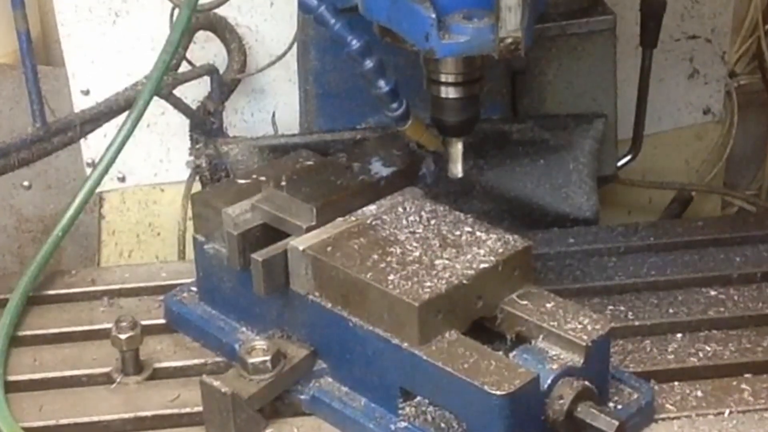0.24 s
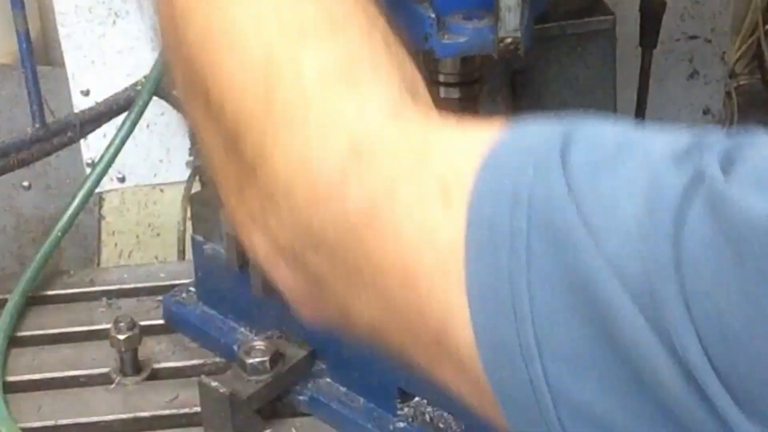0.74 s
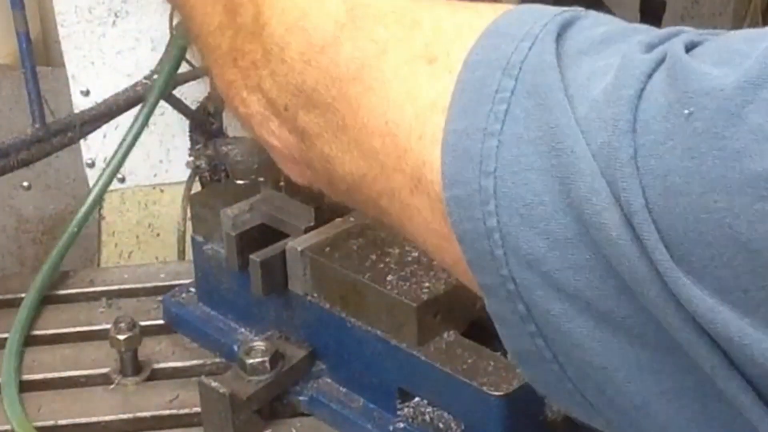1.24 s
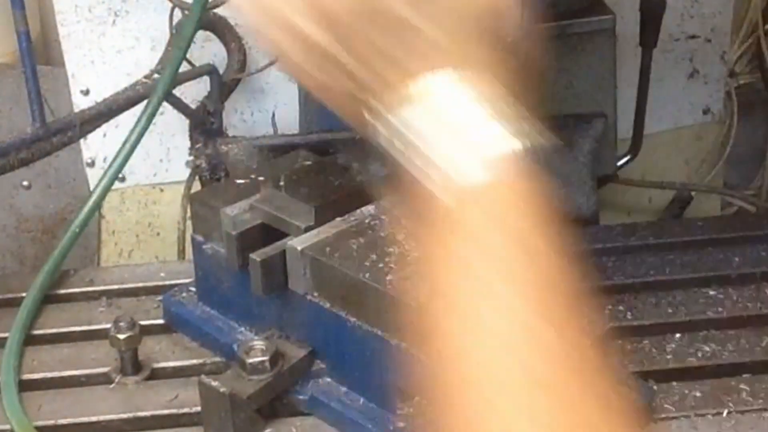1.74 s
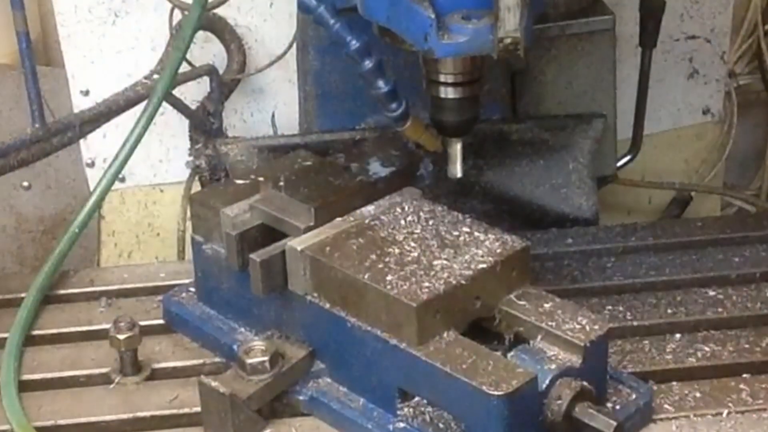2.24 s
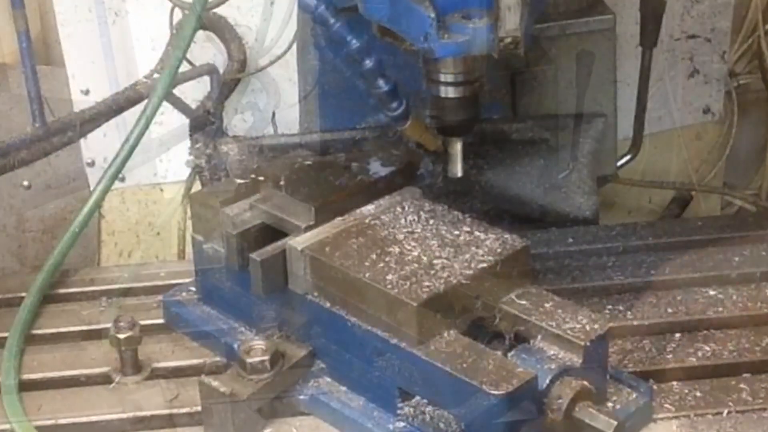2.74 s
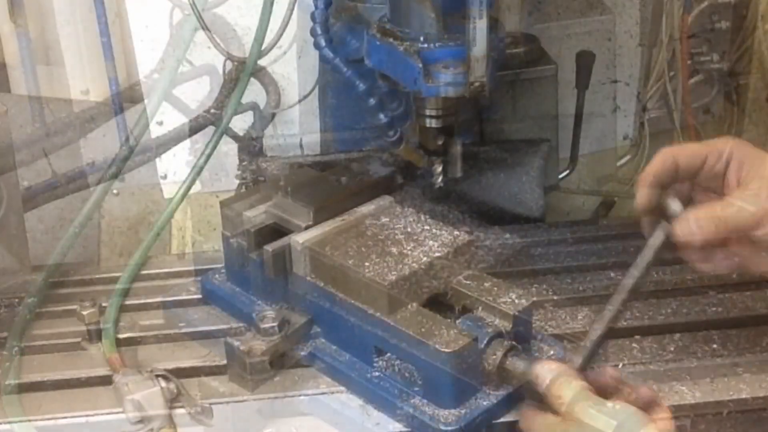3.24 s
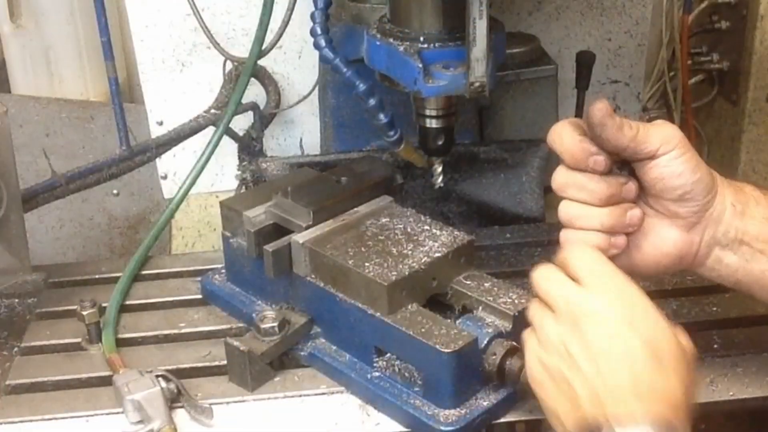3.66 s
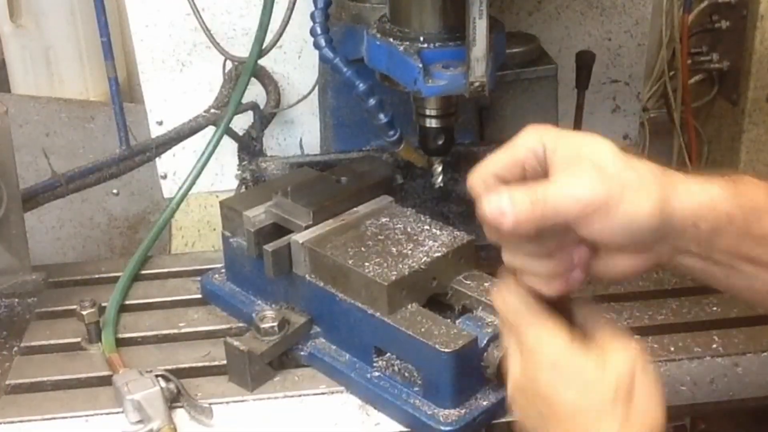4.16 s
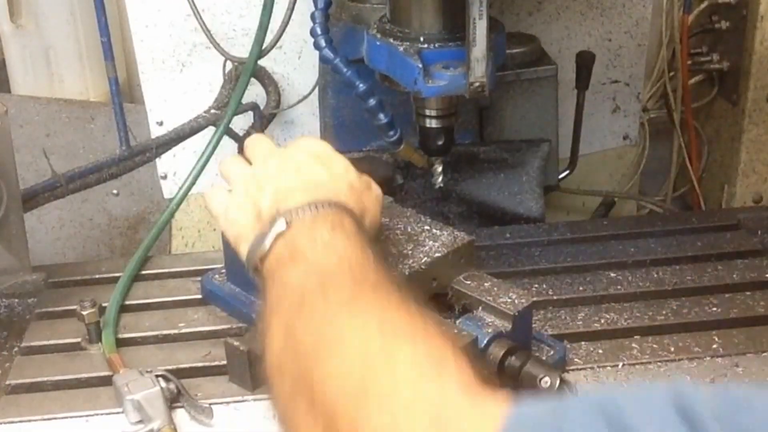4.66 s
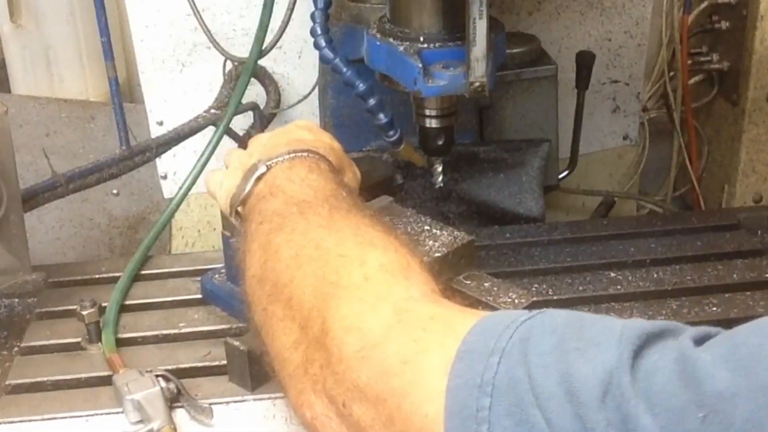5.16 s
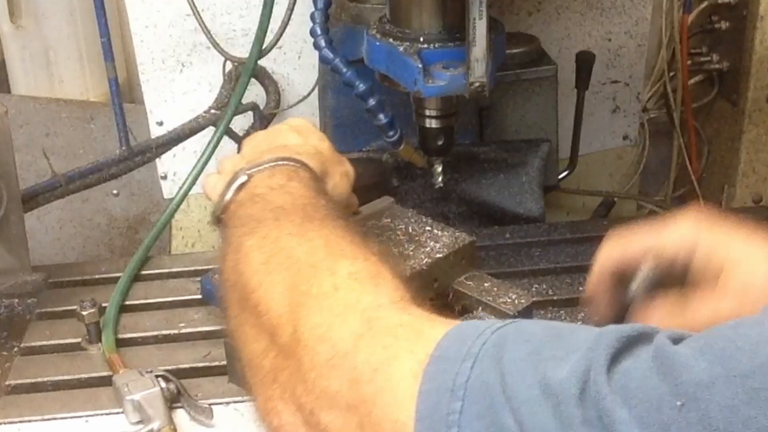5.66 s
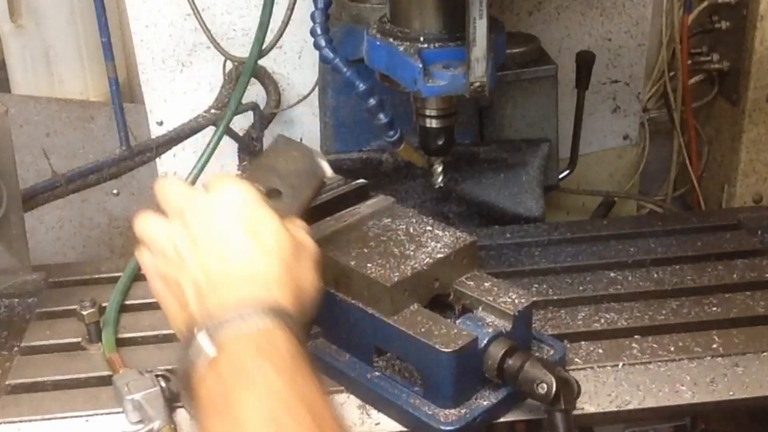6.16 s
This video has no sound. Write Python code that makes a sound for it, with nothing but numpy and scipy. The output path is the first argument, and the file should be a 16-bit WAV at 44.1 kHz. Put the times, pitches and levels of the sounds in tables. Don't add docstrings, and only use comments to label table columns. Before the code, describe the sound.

Geared motor drone and bright air jet with little ticks, abruptly replaced by a soft air leak, metal scrape and clank, squeaks and a final sharp crack.

```python
import sys
import numpy as np
from scipy import signal
from scipy.fft import rfft, irfft, next_fast_len
from scipy.io import wavfile
from scipy.ndimage import uniform_filter1d

SR = 44100
rng = np.random.default_rng(int(sys.argv[2]) if len(sys.argv) > 2 else 0)


def amplitude_ratio(level_db):
    exponent = np.asarray(level_db, float) / 20
    return 10 ** exponent


def bounce(signal):
    frames = np.transpose(np.atleast_2d(signal))
    limited = np.clip(frames, -1, 1)
    pcm = np.round(limited * 32767).astype(np.int16)
    wavfile.write(sys.argv[1], SR, pcm)


N = 281799
CUT_S, CUT_DIP_S = 3.1125, .0012

# pitch_hz, level_db (per Hz)
DRONE_SPECTRUM = [(65, -64), (110, -28), (195, -13.5), (242, -9.5), (302, -6.5), (371, 0), (397, -7.5),
                  (483, -7.5), (850, -12), (1100, -32), (1870, -120)]
# pitch_hz, width_hz, level_db
HOUSING_BOOMS = [(272, 61, -7), (312, 13, -12), (526, 32, -22), (598, 155, 3.5), (710, 4.5, 6)]
# pitch_hz, level_db (per Hz)
RATTLE_SPECTRUM = [(700, -19), (820, -0.5), (950, -5), (1050, 4), (1150, -10), (1260, 2.5), (1400, -3),
                   (1500, -5.5), (1800, -23.5)]
# start_s, rattle_db, motor_lift_db
GEAR_LOAD = [(0, 1, 4), (.25, 1.5, -2), (.55, 0, 3.5), (.67, 3, 0), (.82, -1, -3.5), (.9, 4, 3),
             (1.12, 0.5, -5), (1.35, 3, -1.5), (1.52, -0.5, -17), (1.62, 2, 1.5), (1.77, 0, -6),
             (1.95, 2, 1.5), (2.2, -1, 2), (2.35, 0.5, 2), (2.65, 2.5, 1.5), (2.75, 0.5, 4), (2.85, 0, 0),
             (2.92, 3.5, 0)]
# pitch_hz, level_db
GEAR_TONES = [(123.8, -83), (188.4, -77), (247.6, -61.5), (279.9, -65), (333.8, -67.5), (473.7, -68),
              (613.7, -65), (699.8, -74), (772, -64.5), (877.5, -76), (1040, -78.5), (1071, -69),
              (1249, -70)]
# pitch_hz, level_db
MOTOR_WHINE = [(3000, -80), (3849, -71.5), (3949, -80), (4048, -74.5), (5886, -75), (7897, -75),
               (7998, -69.5)]
# pitch_hz, level_db (per Hz)
BEARING_SPECTRUM = [(820, -19.5), (1400, -10), (1690, -8.5), (1910, -6), (2910, -7), (3410, -8),
                    (3920, -8.5), (4650, -9.5), (6030, -7), (7220, -9.5), (8230, -6), (9750, -9.5),
                    (10700, -19), (14000, -14.5), (15300, -35)]
# pitch_hz, width_hz, level_db
CAGE_RINGS = [(2220, 41, -6), (2500, 45, -4.5), (2630, 37, -6), (2730, 40, -6), (4430, 40, -4),
              (5100, 110, -6), (6580, 21, -5), (8298, 30, -5)]
SHAFT_HZ = 32.8
DRONE_DB, RATTLE_DB, BEARING_DB = -58.5, -59, -53

# pitch_hz, level_db (per Hz)
NOZZLE_SPECTRUM = [(2000, -17), (4000, -14.5), (7000, -9.5), (8200, -3.5), (9300, -5), (10200, -10.5),
                   (11500, -4), (12200, -4.5), (12800, 0.5), (13500, -3), (14300, -1), (15200, -4)]
JET_DB, SHADE_S, SHADE_RAMP_S, SHADE_DB = -44, 0.64, 0.23, -3
SHADE_DULL, SHADE_HZ = 0.46, 11000
VALVE_S, VALVE_DB, SHUT_DB_PER_S = 1.35, -48, 600

# start_s, level_db, pitch_hz, hold_s, fade_60db_s
LEVER_CLICKS = [(.7275, -48, 2950, .006, .03), (.742, -49, 2880, .005, .02), (.753, -52, 2920, .006, .03),
                (1.354, -45, 2810, 0.0037, 0.014), (1.352, -53, 5300, .004, .012),
                (1.363, -47, 3780, .003, .012), (1.575, -60, 2220, 0.012, .04),
                (1.808, -58, 2130, 0.013, 0.036), (2.108, -61, 2630, 0.024, .04),
                (2.655, -58, 2850, 0.027, .05)]
# start_s, peak_db, pitch_hz, fade_60db_s
HEAD_TICKS = [(.494, -40, 2670, .02), (.523, -40, 2220, .02), (.551, -47, 2250, .02),
              (.574, -49, 3020, .02), (.843, -44, 3000, .02), (.87, -42, 2270, 0.022),
              (.958, -44, 2180, .02), (1.806, -49, 2000, .02), (1.834, -58, 2400, .02),
              (1.923, -43, 2280, 0.022), (1.924, -61, 900, 0.027), (1.955, -43, 2150, .02),
              (2.668, -40, 2930, .02), (2.691, -43.5, 2850, 0.016), (2.776, -41, 1050, 0.047),
              (2.916, -47, 1950, .02)]

# start_s, socket_clunk_db, overtone_db, lean_to_upper_modes_db
HANDLE_CLANKS = [(3.26, -50, -61.5, -4), (3.288, -32, -57, 9), (3.2972, -30, -60, 12),
                 (3.3005, -35.5, -43.5, 9), (3.306, -34, -50, 1), (3.310, -36.5, -46, 6),
                 (3.315, -41, -48, -3), (3.321, -50, -62, 4), (3.328, -53, -56, 4), (3.332, -55, -53, -2),
                 (3.3436, -39, -40.5, -6), (3.349, -50, -60, 2), (3.4435, -40.5, -43, 6),
                 (3.4465, -43, -42, -3), (3.454, -48, -55, -5), (3.471, -54, -54, 3), (3.493, -53, -51, 7),
                 (3.509, -53, -54, 11)]
# start_s, level_db, pitch_hz, hold_s, fade_60db_s
METAL_RINGS = [(3.288, -38, 3700, .003, .025), (3.288, -39, 3165, .003, .025),
               (3.297, -33, 3720, .004, .04), (3.297, -37, 3100, 0.0069, .04),
               (3.2975, -36, 1367, 0.017, .04), (3.298, -42.5, 2403, .012, .04),
               (3.306, -37.5, 1773, .014, 0.056), (3.2985, -33, 4910, 0.019, .015),
               (3.305, -40, 5000, .012, .02), (3.322, -46, 4866, 0.0077, 0.029),
               (3.3415, -29, 4758, .003, 0.053), (3.3415, -38, 4870, .003, 0.063),
               (3.352, -46, 1467, 0.0073, .04), (3.414, -53, 4900, 0.0052, .03),
               (3.4235, -41, 1760, .004, 0.014), (3.455, -49, 9500, .008, .025),
               (3.4432, -31, 5080, 0.0045, 0.02), (3.4432, -40.5, 4795, 0.014, 0.064),
               (3.445, -38, 9100, .003, .04), (3.445, -39, 10550, 0.0035, 0.018),
               (3.482, -51, 4870, .008, .04), (3.503, -55, 5400, .006, .03), (3.516, -54, 5230, .006, .03),
               (6.2696, -33.5, 2500, .001, 0.0098), (3.297, -39, 1400, 0.0048, .025),
               (3.267, -46, 1400, .01, .03), (3.274, -50, 1760, .008, .02), (3.298, -45, 6300, .006, .02),
               (5.804, -51.5, 598, 0.0061, 0.035), (5.826, -52, 1300, 0.0076, .04),
               (4.472, -48.5, 1194, 0.0081, .04), (6.34, -54, 1100, 0.0026, 0.027)]
# pitch_hz, level_db, fade_60db_s
BAR_OVERTONES = [(8400, 0, .02), (9200, 6.5, 0.057), (9800, -6, 0.04), (10600, -1, 0.028)]
# pitch_hz, level_db, fade_60db_s
SOCKET_MODES = [(340, -17, 0.076), (450, -7, 0.04), (754, -10.5, 0.091), (1050, -4, 0.057),
                (1300, -1, 0.035), (1386, -2, 0.032), (1500, -1, 0.036), (1763, -4, 0.062),
                (2160, -8, 0.035), (2400, -8, 0.041), (2850, -15, .025), (3114, 3, 0.033), (3634, -2, 0.02),
                (3890, -3, .02)]
# pitch_hz, level_db (per Hz)
CRASH_SPECTRUM = [(150, -61), (300, -6), (1400, -9), (3500, -3), (6300, 2), (7500, -9), (15000, -38)]
# hardest_press_s, level_db
PUSHES = [
    (3.205, -63),
    (3.31, -38.5),
    (3.446, -51),
    (3.49, -57),
]
PRESS_DB_PER_S, EASE_DB_PER_S = 303, 425
SWELL_S = .0016

# start_s, peak_db
PART_SNAPS = [(6.2679, -29), (6.2694, -31), (6.271, -39), (6.2755, -39), (6.2775, -47)]
# pitch_hz, level_db, fade_60db_s
PART_MODES = [(3300, 5, .001), (2500, -22, .014), (1600, -17, .008), (3400, -19, .008), (4600, -19, .006),
              (7500, -20, .002)]
# start_s, level_db, pitch_hz, fade_60db_s
PART_TOUCHES = [(6.292, -53, 2600, .06), (6.307, -54, 2690, .04), (6.342, -52, 3430, .025),
                (6.366, -53, 3400, .025)]
# start_s, level_db
SCREW_SQUEAKS = [(3.989, -56), (4.025, -53), (4.076, -51), (4.097, -51)]
# pitch_hz, level_db, fade_60db_s
SQUEAK_MODES = [(2250, 0, 0.046)]
# start_s, peak_db, pitch_hz, fade_60db_s
JAW_KNOCKS = [(3.29, -49, 450, 0.067), (3.312, -36.5, 745, 0.059), (3.326, -40.5, 340, 0.095),
              (3.370, -43, 340, 0.049), (3.408, -43, 1350, .04), (3.435, -49, 1500, .012),
              (3.456, -43, 460, 0.07), (3.518, -42.5, 400, 0.079), (3.78, -47, 425, .05),
              (4.05, -49, 900, .03), (4.12, -54, 680, .04), (4.47, -46, 900, 0.025),
              (4.473, -43, 1160, 0.038), (4.481, -51, 477, 0.037), (5.804, -41, 570, 0.018),
              (5.824, -44, 754, 0.025), (5.828, -45, 1280, 0.025), (5.837, -59, 820, 0.036),
              (6.34, -46, 786, 0.015)]
KNOCK_CUT_HZ = 1700
# start_s, peak_db, pitch_hz, fade_60db_s
PALM_SCUFFS = [(4.002, -50, 4860, .01), (4.02, -50, 5230, .01), (4.036, -51, 5000, .01)]

# pitch_hz, level_db (per Hz)
RUMBLE_SPECTRUM = [(65, -14), (110, -14.5), (186, -4.5), (238, -2.5), (264, -3), (337, -5.5), (516, -12),
                   (653, -12.5), (739, -9.5), (764, -10.5), (826, -15.5), (1350, -20), (1600, -19.5),
                   (2080, -51), (3520, -120)]
# pitch_hz, width_hz, level_db
DUCT_BOOMS = [(403, 34, 0.5), (436, 30, -9.5)]
# pitch_hz, level_db (per Hz)
LEAK_SPECTRUM = [(590, -28), (1000, -23), (1410, -13.5), (1810, -6.5), (2100, -9.5), (2270, -3), (2960, -6),
                 (4510, -4), (5230, -4), (6430, -3.5), (7200, -4), (8170, -3), (9580, -3.5), (14600, -4.5),
                 (15300, -5.5)]
# pitch_hz, width_hz, level_db
PIPE_RINGS = [(1804, 50, -3), (2000, 33, -0.5), (2192, 63, -0.5), (2500, 200, -4.5), (3360, 60, -6.5),
              (4040, 31, -4), (5130, 25, -1), (5320, 30, -7), (5470, 30, 1), (6015, 40, -4), (6950, 60, -2),
              (7220, 33, 1), (7520, 73, -13), (7490, 30, -6), (7600, 50, -7), (8070, 30, -4),
              (8600, 36, -11), (9000, 36, 0), (9190, 80, -1), (9635, 70, -2), (10000, 40, -5)]
# pitch_hz, level_db
SHOP_HUM = [(295.5, -71.5), (337.5, -69.5), (780.9, -71), (1858, -79), (2008, -84), (2212, -82)]
RUMBLE_DB, LEAK_DB = -60.5, -53
STANDING_DB, STANDING_HZ = 1.2, 30

# pitch_hz, threshold_db (against nearby sound)
LINK_THRESHOLDS = [(100, -30), (1000, -12), (3000, -6), (8000, -4.5), (10000, -4), (11000, -3),
                   (15300, -2.5)]
TOP_HZ = 15310
# start_s, centre_hz
EAR_SPLITS = [(.757, 6300), (.757, 8000), (.757, 9000), (.895, 7650), (1.686, 9000), (2.613, 4950),
              (3.612, 7000), (3.891, 8250), (4.634, 6300), (4.634, 7000), (4.845, 8250), (4.984, 4700),
              (5.631, 8250), (5.863, 4750), (5.863, 10300), (5.933, 6300), (6.026, 8250)]
SPLIT_S, SPLIT_WIDTH_HZ, SPLIT_DB = .04, 1300, 0


def spindle():
    t = np.arange(N) / SR
    throb = 1 + 0.19 * np.sin(2 * np.pi * SHAFT_HZ * t + smooth(0.93 * drift(0.62)))
    s, load_db, lift_db = np.transpose(GEAR_LOAD)
    load = amplitude_ratio(np.interp(t, s, load_db))
    lift = amplitude_ratio(np.interp(t, s, lift_db))
    drone = coloured(DRONE_SPECTRUM, HOUSING_BOOMS, lift_db=-1.0, patchy_db=-0.5, rate=4.1, count=6)
    rattle = coloured(RATTLE_SPECTRUM, patchy_db=1.0, rate=14.0, count=4)
    hiss = coloured(BEARING_SPECTRUM, CAGE_RINGS, patchy_db=0.62, rate=29.0, count=5)
    motor = amplitude_ratio(-1.5) * lift * tones(GEAR_TONES[:5], wobble_db=1.56, waver=1.46, rate=7.7)
    mesh = amplitude_ratio(-2.0) * load * tones(GEAR_TONES[5:], wobble_db=4.0, waver=2.1, rate=7.6)
    whine = tones(MOTOR_WHINE, wobble_db=3.5, waver=0.78, rate=4.7)
    gears = throb * load * (amplitude_ratio(DRONE_DB) * drone + amplitude_ratio(RATTLE_DB) * rattle)
    return gears + amplitude_ratio(BEARING_DB) * hiss + motor + mesh + whine


def mist():
    t = np.arange(N) / SR
    shade = np.clip((t - SHADE_S) / SHADE_RAMP_S, 0, 1)
    jet_db = JET_DB + SHADE_DB * shade - SHUT_DB_PER_S * np.clip(t - VALVE_S, 0, 1)
    jet = coloured(NOZZLE_SPECTRUM, [(13500, 90, -3)], patchy_db=1.1, rate=4.1, count=5)
    high = signal.butter(2, SHADE_HZ, "high", fs=SR, output="sos")
    top = signal.sosfiltfilt(high, jet)
    band = signal.butter(2, [2300, 5600], "band", fs=SR, output="sos")
    click = signal.sosfilt(band, rng.standard_normal(N)) * cracks([VALVE_S], VALVE_DB + 6.0, fade_s=0.0069)
    return amplitude_ratio(jet_db) * (jet - SHADE_DULL * shade * top) + click


def levers():
    ticks = small_hits(HEAD_TICKS, smear_s=0.023, partner=1.13, trim_db=-2.5, damp=0.29)
    return rings(LEVER_CLICKS, rough_db=4, waver=1.3) + ticks


def handle():
    s, clunk_db, overtone_db, lean_db = np.transpose(HANDLE_CLANKS)
    bar = rings(METAL_RINGS, rough_db=1.8, waver=.18)
    bar = bar + strike(s, overtone_db - 8.0, BAR_OVERTONES, spread_db=2.0)
    socket = strike(s, clunk_db - 7, SOCKET_MODES[:10], spread_db=2)
    socket = socket + strike(s, clunk_db + lean_db - 12.5, SOCKET_MODES[10:], spread_db=3.0)
    noise = coloured(CRASH_SPECTRUM, count=2)
    chatter = np.abs(signal.lfilter([1], [1, -.93], grit(500, 3.4)))
    crash = noise * (.5 + 0.28 * rms_one(chatter)) * cracks(s, clunk_db - 8.0, fade_s=0.006)
    tick = rng.standard_normal(N) * cracks(s, overtone_db - 2.5, fade_s=0.0044)
    return bar + socket + crash + tick + scrape(noise)


def scrape(noise):
    t = np.arange(N) / SR
    pressure = 0
    for at, db in PUSHES:
        slope_db = np.minimum(PRESS_DB_PER_S * (t - at), EASE_DB_PER_S * (at - t))
        pressure = pressure + amplitude_ratio(db + slope_db)
    contact = grit(1200, 1.8)
    ringing = sum(amplitude_ratio(db) * ring(contact, hz, 0.27 * t60) for hz, db, t60 in SOCKET_MODES[2:10])
    return pressure * (rms_one(ringing) + 0.54 * noise)


def part_and_screw():
    s, db = np.transpose(PART_SNAPS)
    crack = strike(s, db, PART_MODES, spread_db=.5)
    squeak = strike(*np.transpose(SCREW_SQUEAKS), SQUEAK_MODES, spread_db=0)
    touches = sum(strike([at], level_db, [(hz, 0, t60)], spread_db=0)
                  for at, level_db, hz, t60 in PART_TOUCHES)
    return crack + squeak + touches


def knocks():
    s, db = np.transpose(JAW_KNOCKS)[:2]
    band = signal.butter(2, [420, 1500], "band", fs=SR, output="sos")
    body = signal.sosfilt(band, rng.standard_normal(N)) * cracks(s, db - 10.0, fade_s=0.026)
    thuds = body + small_hits(JAW_KNOCKS, smear_s=0.0046, partner=1.05, trim_db=-2.0, damp=0.37)
    return signal.sosfilt(signal.butter(4, KNOCK_CUT_HZ, fs=SR, output="sos"), thuds)


def scuffs():
    return small_hits(PALM_SCUFFS, smear_s=0.02, partner=1.15, trim_db=2, damp=0.62)


def shop():
    rumble = coloured(RUMBLE_SPECTRUM, DUCT_BOOMS, patchy_db=-0.5, rate=4.3, count=5)
    leak = coloured(LEAK_SPECTRUM, PIPE_RINGS, lift_db=4.0, patchy_db=0.5, rate=8.5, count=6)
    hum = tones(SHOP_HUM, wobble_db=1.5, waver=0.46, rate=2.5)
    return amplitude_ratio(RUMBLE_DB) * rumble + amplitude_ratio(LEAK_DB) * leak + amplitude_ratio(2.0) * hum


def walls(x, t60):
    t = np.arange(round(.4 * SR)) / SR
    tail = signal.lfilter([1], [1, -.5], rng.standard_normal(len(t)))
    tail = tail * amplitude_ratio(-60 * t / t60) * (t > .006)
    return signal.fftconvolve(x, tail / np.sqrt(np.sum(tail ** 2)))[:N]


def coloured(spectrum, peaks=(), lift_db=0, patchy_db=6.0, rate=8.7, count=8):
    size = next_fast_len(N)
    hz = np.arange(1, size // 2 + 2) * SR / size
    points = np.array(spectrum)
    gain = amplitude_ratio(np.interp(np.log(hz), np.log(points[:, 0]), points[:, 1]))
    for centre_hz, width_hz, db in peaks:
        gain = gain * (1 + amplitude_ratio(db + lift_db) / (1 + (2 * (hz - centre_hz) / width_hz) ** 2))
    ripple = np.interp(hz / STANDING_HZ, np.arange(2000), rng.standard_normal(2000))
    gain = gain * amplitude_ratio(STANDING_DB * ripple * (hz > 1500))
    shaped = gain * rfft(rng.standard_normal(size))
    place = np.interp(np.log(hz), np.log(points[[0, -1], 0]), [0, count - 1])
    out, together = 0, drift(rate / 2)
    for k in range(count):
        window = np.cos(np.pi / 2 * np.clip(place - k, -1, 1)) ** 2
        flicker = smooth(amplitude_ratio(patchy_db * (together / 2 + drift(rate))))
        out = out + flicker * irfft(shaped * window, size)[:N]
    return rms_one(out)


def tones(lines, wobble_db, waver, rate):
    t, out = np.arange(N) / SR, 0
    for hz, db in lines:
        level = smooth(np.sqrt(2) * amplitude_ratio(db + wobble_db * drift(rate)))
        out = out + level * np.sin(2 * np.pi * hz * t + smooth(waver * drift(rate / 2)))
    return out


def rings(rows, rough_db, waver):
    out, t = np.zeros(N), np.arange(6000) / SR
    uneven = smooth(amplitude_ratio(rough_db * drift(120.0)))
    wander = smooth(waver * drift(60.0))
    for k, (s, db, hz, hold_s, t60) in enumerate(rows):
        i, own = round(s * SR), slice(6000 * k, 6000 * (k + 1))
        fade = amplitude_ratio(db - 60 * np.maximum(t - hold_s, 0) / t60)
        shape = uneven[own] * (1 - np.exp(-t / SWELL_S)) * fade
        tone = shape * np.sin(2 * np.pi * hz * t + wander[own])
        out[i:i + 6000] += (-1) ** k * tone[:N - i]
    return out


def ring(clicks, hz, t60):
    r, w = amplitude_ratio(-60 / (max(t60, .001) * SR)), 2 * np.pi * hz / SR
    return signal.lfilter([.5, 0, -.5], [1, -2 * r * np.cos(w), r * r], clicks + 1e-18)


def strike(times, levels_db, modes, spread_db):
    at, out = np.round(np.array(times) * SR).astype(int), np.zeros(N)
    heard = out[at[0]:at[-1] + SR // 4]
    chance = rng.standard_normal((len(at), len(modes)))
    for k, (hz, db, t60) in enumerate(modes):
        clicks = np.zeros(len(heard))
        clicks[at - at[0]] = amplitude_ratio(levels_db + db + spread_db * chance[:, k]) * (-1) ** k
        heard += ring(clicks, hz, t60)
    return out


def small_hits(rows, smear_s, partner, trim_db, damp):
    out, t, contact = np.zeros(N), np.arange(N) / SR, grit(2500, 0.92)
    for s, db, hz, t60 in rows:
        i = round(s * SR)
        burst = contact[i:i + 6000] * np.exp(-t[:6000][:N - i] / smear_s)
        burst[0] = 3
        hit = ring(burst, hz, t60)
        hit = hit + 0.26 * ring(burst, partner * hz, damp * t60)
        hit = hit + 1.0 * ring(burst, hz / partner, damp * t60)
        out[i:i + 6000] += amplitude_ratio(db + trim_db) * hit / np.max(np.abs(hit))
    return out


def grit(per_s, spread_db):
    sizes = amplitude_ratio(spread_db * np.minimum(rng.exponential(1, N), 4)) * rng.choice([-1, 1], N)
    return sizes * (rng.random(N) < per_s / SR)


def cracks(times, levels_db, fade_s):
    clicks = np.zeros(N)
    clicks[np.round(np.array(times) * SR).astype(int)] = amplitude_ratio(levels_db)
    return signal.lfilter([1], [1, -np.exp(-1 / (fade_s * SR))], clicks + 1e-18)


def drift(rate):
    r = np.exp(-80 * np.pi * rate / SR)
    slow = signal.lfilter([1], [1, -2 * r, r * r], rng.standard_normal(N // 40 + 2002))
    return rms_one(slow[2000:])


def smooth(slow):
    return np.interp(np.arange(N) / 40, np.arange(len(slow)), slow)


def rms_one(x):
    return x / np.sqrt(np.mean(x ** 2) + 1e-20)


def scene():
    edge = (np.arange(N) / SR - CUT_S) / CUT_DIP_S
    running = spindle() + mist() + levers()
    hits = handle() + part_and_screw() + knocks() + scuffs()
    still = shop() + hits + amplitude_ratio(-12.5) * walls(hits, t60=0.15)
    mono = running * np.clip(-edge, 0, 1) + still * np.clip(edge, 0, 1)
    return np.array([mono, mono])


def dropouts(x):
    hz, _, cells = signal.stft(x, SR, nperseg=2048, noverlap=1024)
    power = np.abs(cells) ** 2 + 1e-20
    local = uniform_filter1d(uniform_filter1d(power, size=3, axis=0), size=3, axis=1)
    local_db = 10 * np.log10(local + 1e-20)
    steady_db = np.minimum(local_db, uniform_filter1d(local_db, size=41, axis=1) + 4)
    masker_db = uniform_filter1d(steady_db, size=45, axis=0, origin=14)
    margin_db = local_db - masker_db - np.interp(hz, *np.transpose(LINK_THRESHOLDS))[:, None]
    keep = .5 + .5 * np.tanh(margin_db / .5)
    kept = cells * keep * (hz < TOP_HZ)[:, None]
    return signal.istft(kept, SR, nperseg=2048, noverlap=1024)[1][:N]


def splits(x):
    side, size = np.zeros(N), round(SPLIT_S * SR)
    for s, hz in EAR_SPLITS:
        i = round(s * SR) - size // 2
        edges_hz = [hz - SPLIT_WIDTH_HZ / 2, hz + SPLIT_WIDTH_HZ / 2]
        band = signal.butter(10, edges_hz, "band", fs=SR, output="sos")
        side[i:i + size] += np.hanning(size) * signal.sosfilt(band, x[i + size:i + 2 * size])
    return amplitude_ratio(SPLIT_DB) * side


def band_limit(x):
    return signal.sosfilt(signal.butter(12, 15910, fs=SR, output="sos"), x)


def record(dry):
    mono = signal.sosfilt(signal.butter(4, 150, "high", fs=SR, output="sos"), dry[0])
    floor = signal.lfilter([.02], [1, -.98], rng.standard_normal(N))
    mono = dropouts(mono + amplitude_ratio(-79.5) * floor)
    mix = mono + splits(mono) * [[1], [-1]]
    return band_limit(mix)


dry = scene()
out = record(dry)
bounce(out)
```